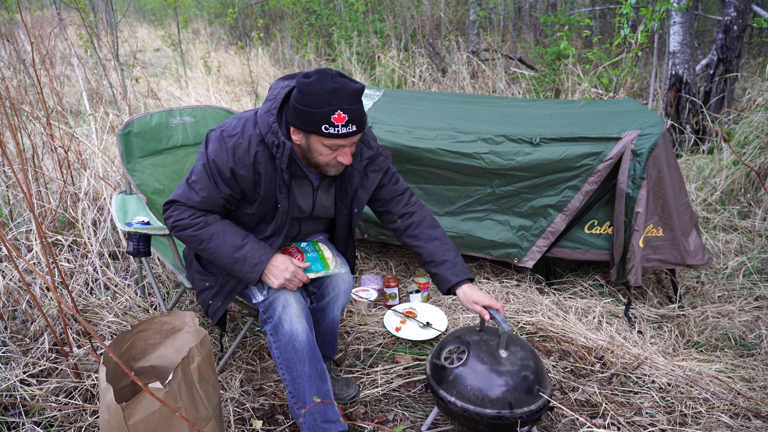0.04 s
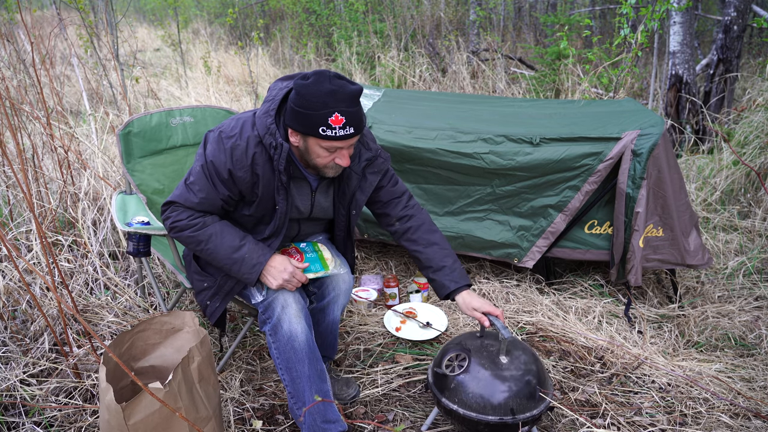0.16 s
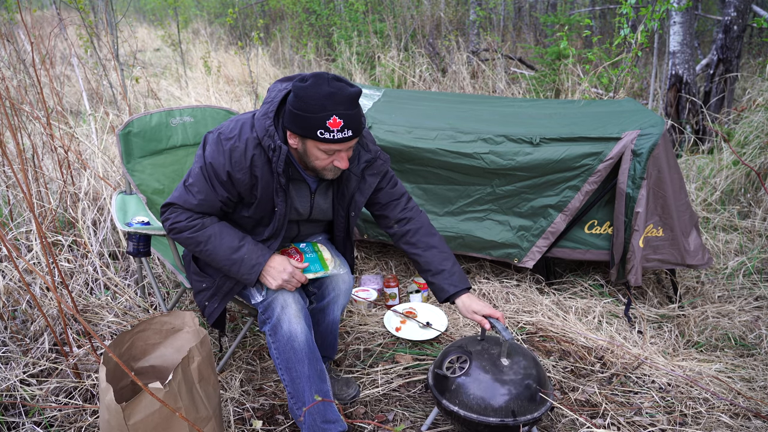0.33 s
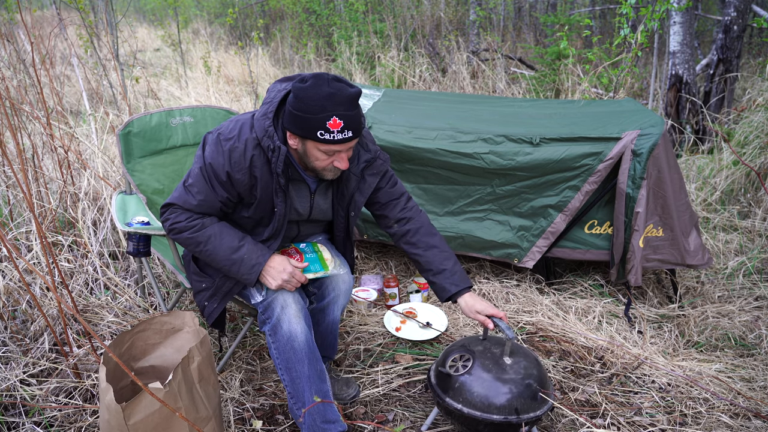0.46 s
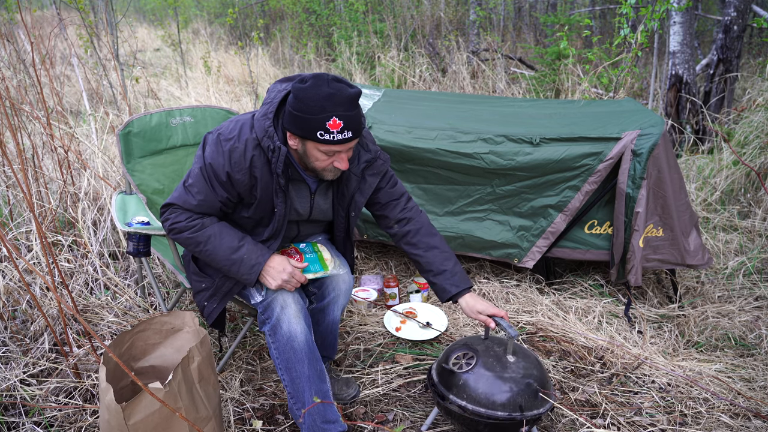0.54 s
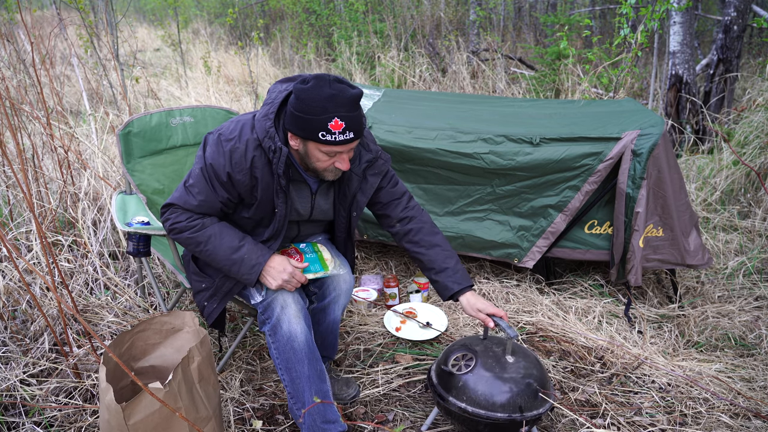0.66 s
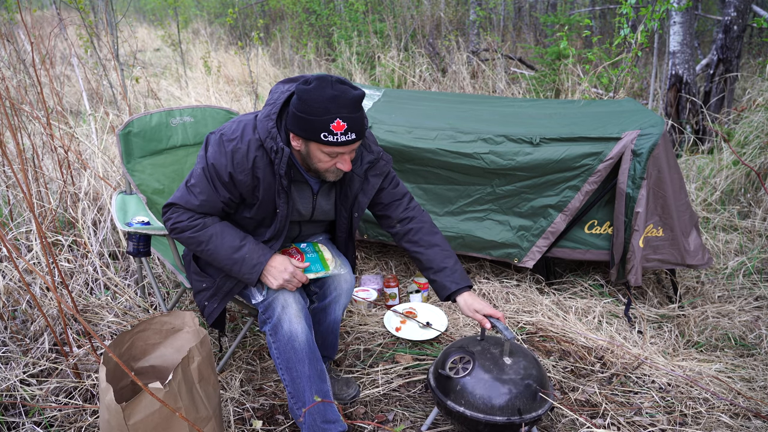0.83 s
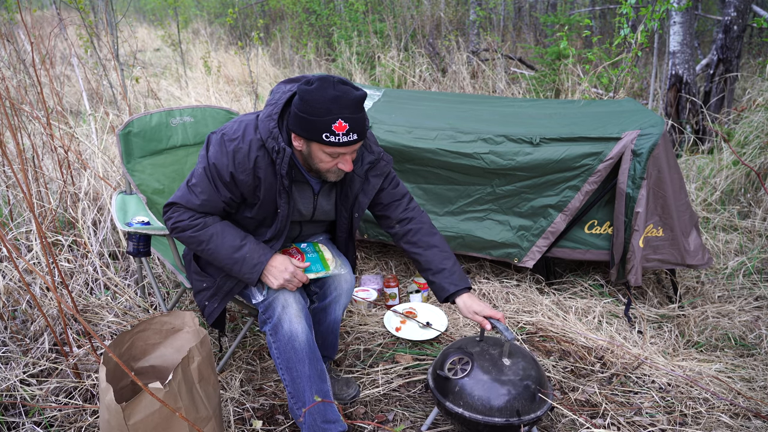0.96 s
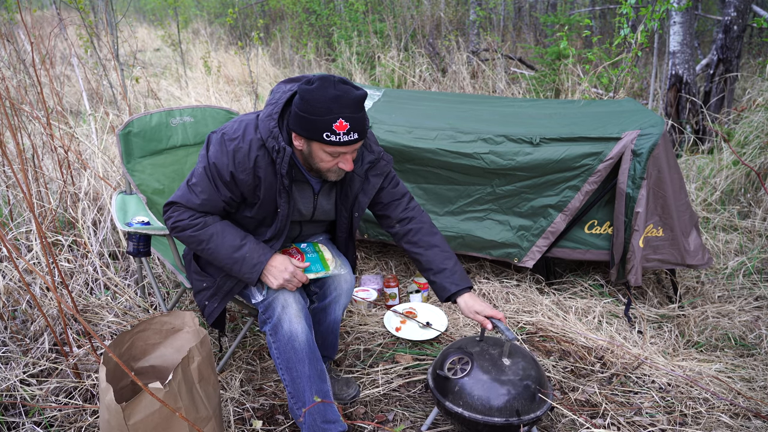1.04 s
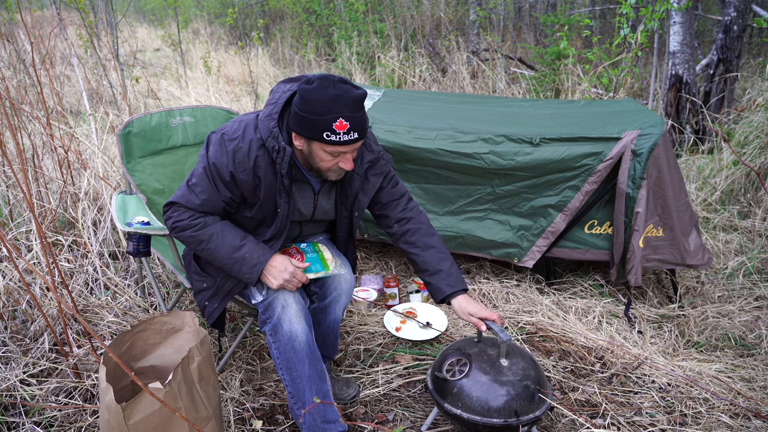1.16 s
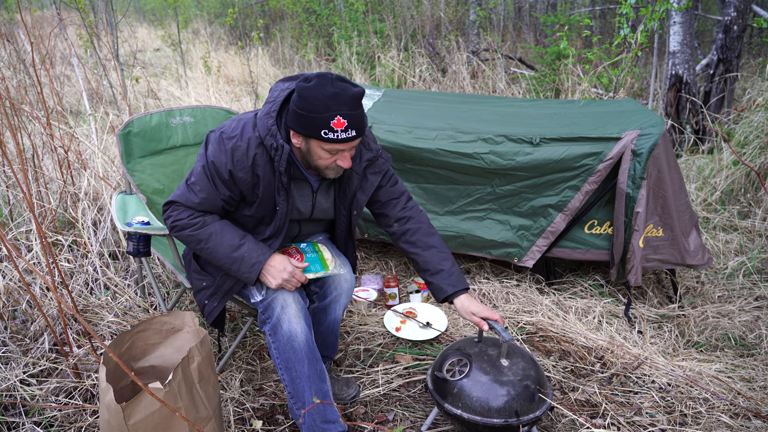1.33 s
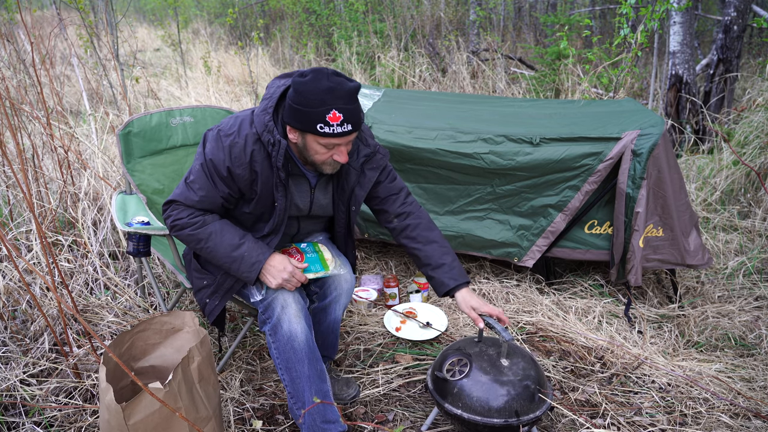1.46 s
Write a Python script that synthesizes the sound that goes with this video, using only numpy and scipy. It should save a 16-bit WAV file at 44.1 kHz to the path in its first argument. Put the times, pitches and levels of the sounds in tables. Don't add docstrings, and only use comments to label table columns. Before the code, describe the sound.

Close up outdoors, a thin steel lid lightly scrapes, clangs brightly on a small charcoal grill, thuds hollowly, rings and grinds round until it settles with a last clank, over soft breeze and dry grass snaps.

```python
import sys
import numpy as np
from scipy import signal
from scipy.fft import rfft, irfft, next_fast_len
from scipy.io import wavfile
from scipy.ndimage import map_coordinates

SR = 44100
rng = np.random.default_rng(int(sys.argv[2]) if len(sys.argv) > 2 else 0)


def convert_level_to_amplitude(level_db):
    exponent = np.asarray(level_db, float) / 20
    return 10 ** exponent


def put_to_file(sound):
    columns = np.atleast_2d(sound).T
    safe = np.clip(columns, -1, 1)
    whole_steps = np.round(safe * 32767)
    wavfile.write(sys.argv[1], SR, whole_steps.astype(np.int16))


N = 66150
TIME = np.arange(N) / SR

# (time [s], level [dB], polarity [-], modes (frequency [Hz], level [dB], t60 [s]))
THUDS = [
    (0.229, -8, -0.98, [(400, 2, 0.014), (546, 8.5, 0.0041)]),
    (.3022, -4.5, -1, [(215.6, -4.5, 0.084), (260, -1, 0.046), (384, 2, 0.055), (703, -11, 0.089), (1548, -15.5, 0.2005), (3415, -27, 0.207)]),
    (0.4701, -6, -0.83, [(280.2, 7.5, 0.055), (696, -1, 0.069), (480, 17, 0.0084), (1683, -21, 0.2), (2790, -17, 0.08)]),
    (0.9326, -11.5, 0.89, [(373, -23, 0.065), (595, 0.5, 0.034), (719, -13.5, 0.12), (810, 5, 0.058), (1690, -11, 0.038), (1910, -14, 0.12), (2000, -15, 0.3), (948, -6, 0.071)]),
    (1.2015, -4.5, -1.07, [(216.4, 0, 0.079), (256, -5.5, 0.063), (417, 7.5, 0.023), (552, 1.5, 0.016), (738, -5.5, 0.047), (900, -23, 0.09), (2220, -24, 0.26)]),
]
ROCK_ATTACK_S = 0.0014
TICK_HZ, TICK_WIDTH_HZ = 2400, 6000


def unit(x):
    return x / np.sqrt(np.mean(x ** 2) + 1e-20)


def along(points, hz):
    f, value = np.transpose(points)
    return np.interp(np.log(hz + 1), np.log(f + 1), value)


def wobble(rate):
    values = rng.standard_normal(int(N * rate / SR) + 4)
    return map_coordinates(values, [TIME * rate])


def filtered(x, response):
    m = next_fast_len(N + SR // 2)
    return irfft(rfft(x, m) * response(np.fft.rfftfreq(m, 1 / SR)), m)[..., :N]


def peak(f, hz, width):
    return 1j * f * width / (hz * hz - f * f + 1j * f * width)


def decay(start, db, t60):
    return (TIME >= start) * convert_level_to_amplitude(db - 60 * np.maximum(TIME - start, 0) / t60)


def ring(start, modes, attack):
    hand_t60, buzz_rad, buzz_per_s, buzz_above_hz = .18, .8, 60, 1200
    t = np.maximum(TIME - start, 0)
    total = np.zeros(N)
    for hz, db, t60 in modes:
        buzz = buzz_rad * (hz > buzz_above_hz) * wobble(buzz_per_s)
        envelope = convert_level_to_amplitude(db - 60 * t / min(t60, hand_t60))
        total = total + envelope * np.sin(2 * np.pi * hz * t + buzz)
    return total * (1 - np.exp(-t / attack))


def air():
    # (frequency [Hz], density [dB per Hz])
    hiss_colour = [(12, -37), (20, 0), (177, -20.5), (485, -12.5), (923, -16), (1060, -21.5), (5530, -27.5),
                   (7520, -29), (16000, -41)]
    # (time [s], level [dB])
    hiss_level = [(0, 4), (.15, 3.5), (.5, 3.5), (1.1, 0.5), (1.35, -1.5), (1.5, 1.5)]
    # (time [s], level [dB])
    wind = [(0, -62), (.07, -56), (.16, -70), (.45, -62), (.55, -78), (1.1, -76), (1.17, -52), (1.25, -61),
            (1.5, -75)]
    air_db, rumble_hz = -52, 110
    hiss = unit(filtered(rng.standard_normal(N), lambda f: convert_level_to_amplitude(along(hiss_colour, f))))
    rumble = unit(filtered(rng.standard_normal(N), lambda f: 1 / (1 + (f / rumble_hz) ** 2)))
    hiss_db = air_db + np.interp(TIME, *np.transpose(hiss_level)) + 0.52 * wobble(11.64)
    rumble_db = np.interp(TIME, *np.transpose(wind)) + 1.1 * wobble(13.0)
    return convert_level_to_amplitude(hiss_db) * hiss + convert_level_to_amplitude(rumble_db) * rumble


def grit():
    grains_per_s, spread_db, judder_db = 9000, 2, 1.5
    hit = rng.random(N) < grains_per_s / SR
    size_db = spread_db * np.minimum(rng.exponential(size=N), 4) + judder_db * wobble(120)
    return unit(hit * rng.choice([-1, 1], N) * convert_level_to_amplitude(size_db))


def contact():
    starts = [.179, .255, .414, .445, .485, .565, .70, .849, .9, .935, .98, 1.07, 1.129, 1.155, 1.205, 1.41,
              0, 1.25]
    lengths = [.049, .09, .03, .025, .08, .06, .15, .051, .033, .04, .05, .025, .026, .046, .04, .09, .12,
               .08]
    press_start_db = [-35.5, -30, -47.5, -38, -31, -45.5, -41.5, -32.5, -31, -25, -43, -51, -39.5, -30.5,
                      -26, -56.5, -56, -53]
    press_end_db = [-31, -32.5, -35.5, -38, -37, -43.5, -43.5, -26, -27, -34.5, -44, -58.5, -44, -29.5, -38,
                    -55, -69, -60.5]
    treble_db = [3, -17, 7, 12, 1, 3, 5, 7.5, 7, -5, 6, 14, 0, 10.5, -4, 11.5, 10, 2]
    # (time [s], strength [dB], brightness [dB], rattle t60 [s])
    taps = [(.3035, -23.5, -22, 0.079), (.4698, -16, -23, 0.036), (.6535, -39.5, -12, 0.15),
            (.9325, -22, -18, 0.058), (1.2012, -15.5, -21, 0.029), (1.129, -34, 3, 0.016),
            (1.1555, -41, 7, 0.017), (.4145, -31.5, -18, 0.014), (0.19, -33, 3, 0.023),
            (0.25, -38.5, 14, 0.026), (.955, -26.5, -3, .02), (1.231, -25.5, -12, 0.021)]
    attack_s, release_s = 0.0015, 0.016
    dull, bright = np.zeros(N), np.zeros(N)
    strokes = zip(starts, lengths, press_start_db, press_end_db, treble_db)
    for start, length, from_db, to_db, bright_db in strokes:
        t = TIME - start
        press = convert_level_to_amplitude(np.interp(t, [0, length], [from_db, to_db])) * np.clip(t / attack_s, 0, 1)
        press = press * np.exp(-np.maximum(t - length, 0) / release_s)
        dull = dull + press
        bright = bright + press * convert_level_to_amplitude(bright_db)
    for start, db, bright_db, t60 in taps:
        press = decay(start, db, t60)
        dull = dull + press
        bright = bright + press * convert_level_to_amplitude(bright_db)
    return dull, bright


def sheet(colour):
    # (frequency [Hz], t60 [s])
    sheet_t60 = [(300, 0.036), (2000, 0.11), (6000, 0.072), (14000, 0.04)]
    hz, t, z = signal.stft(rng.standard_normal(SR // 4), SR, nperseg=128)
    level_db = along(colour, hz)[:, None] - 60 * t / along(sheet_t60, hz)[:, None]
    h = signal.istft(z * convert_level_to_amplitude(level_db), SR, nperseg=128)[1]
    return h / np.linalg.norm(h)


def shifting(force, count=17):
    # (frequency [Hz], density [dB per Hz])
    sheet_colour = [(120, -21), (300, -3.5), (800, -11), (1250, -9.5), (2100, -5), (7500, -18),
                    (10500, -30.5), (16000, -50)]
    shift_s = 0.0907
    total = np.zeros(N)
    for k in range(count + 1):
        share = np.sqrt(np.clip(1 - np.abs(TIME / shift_s - k), 0, 1))
        total = total + signal.fftconvolve(force * share, sheet(sheet_colour))[:N]
    return total


def scraping():
    # (frequency [Hz], width [Hz], level [dB])
    lid_modes = [(1542, 36, -14), (1664, 18, 0.5), (1783, 90, -3.5), (1990, 23, 1), (2128, 62, -3.5),
                 (2259, 41, -2.5), (2837, 55, -16), (2945, 180, -15), (3333, 130, -10.5), (4044, 58, -7.5),
                 (4380, 46, -26), (5600, 84, -36), (7670, 250, -20.5)]
    bright_hz, grit_db, lid_db = 4150, -18.5, -4
    hollow_db, hollow_hz, hollow_width_hz = -6.5, 250, 63

    def high(f):
        return (1j * f / bright_hz / (1 + 1j * f / bright_hz)) ** 2

    def lid_response(f):
        return sum((-1) ** k * convert_level_to_amplitude(db) * peak(f, hz, width)
                   for k, (hz, width, db) in enumerate(lid_modes))

    def hollow_response(f):
        return peak(f, hollow_hz, hollow_width_hz) * np.sqrt(SR / hollow_width_hz / np.pi)

    dull, bright = contact()
    grains = grit()
    force = filtered(grains, lambda f: 1 - high(f)) * dull + filtered(grains, high) * bright
    direct = filtered(force, lambda f: peak(f, TICK_HZ, TICK_WIDTH_HZ))
    clear = filtered(force, lid_response) / np.std(filtered(grit(), lid_response))
    hollow = filtered(rng.standard_normal(N) * dull, hollow_response)
    return shifting(force) + convert_level_to_amplitude(grit_db) * direct + convert_level_to_amplitude(lid_db) * clear + convert_level_to_amplitude(hollow_db) * hollow


def singing():
    # (time [s], level [dB], frequency [Hz], t60 [s])
    rings = [(.181, -31, 2210, 0.18), (.189, -30, 4550, 0.072), (.192, -30, 5030, 0.04),
             (.192, -32, 3320, 0.11), (.31, -29, 2266, .17), (.31, -37, 3036, 0.061),
             (.333, -22.5, 3400, 0.059), (.316, -36, 4506, .1), (.32, -34, 4700, 0.11),
             (.36, -47, 2800, 0.053), (.416, -26.5, 2230, .1), (.418, -34, 1930, .08),
             (.472, -30, 2275, 0.13), (.495, -29, 3300, .08), (.5, -34, 2170, .12),
             (.53, -29.5, 1935, 0.13), (.535, -40, 2260, 0.13), (.61, -37.5, 2153, 0.25),
             (.655, -30, 1770, 0.054), (.662, -42, 2900, 0.1), (.905, -24.5, 3914, 0.2),
             (.91, -24.5, 2895, 0.17), (.935, -21.5, 3330, 0.14), (.965, -28, 1960, 0.12),
             (.995, -30.5, 1960, 0.2), (1, -35.5, 1895, 0.16), (1.13, -39, 2228, 0.073),
             (1.13, -52, 4100, .06), (1.1565, -25, 5600, 0.036), (1.1565, -24.5, 7500, 0.055),
             (1.202, -23, 2686, 0.056), (1.203, -24, 1653, 0.11), (1.21, -29.5, 3343, .15),
             (1.215, -32, 4700, 0.1), (1.22, -32, 4522, 0.14), (1.228, -22.5, 2260, 0.15),
             (1.288, -42, 2260, .1), (.85, -34.5, 816, 0.14), (0.896, -30, 1240, .05), (.57, -35, 832, .08),
             (.985, -38, 772, .1), (0.304, -20, 1880, 0.076), (.325, -28, 2170, 0.13),
             (.77, -42, 292, 0.072), (0.469, -24, 4670, 0.044), (1.166, -35, 5500, .06),
             (.045, -46, 1100, 0.096)]
    return sum(ring(s, [(hz, db, t60)], ROCK_ATTACK_S) for s, db, hz, t60 in rings)


def ticks():
    # (time [s], level [dB], t60 [s])
    snaps = [
        (.0458, -28, .014),
        (.079, -40, .01),
        (.148, -38, .01),
        (.2299, -4, .008),
        (.4705, -17, .003),
        (1.018, -39, .008),
        (1.31, -45, .01),
        (.2345, -5, .006),
        (.8565, -24, .012),
        (1.1562, -19, .008),
    ]
    top_hz = [6000, 6000, 10000, 14000, 9000, 8000, 7000, 15000, 9000, 12000]
    noise = rng.standard_normal(N)
    total = np.zeros(N)
    for (start, db, t60), hz in zip(snaps, top_hz):
        burst = decay(start, db, t60) * noise
        total = total + filtered(
            burst, lambda f: peak(f, TICK_HZ, TICK_WIDTH_HZ) / (1 + 1j * f / hz) ** 2)
    return total


def dome():
    # (time [s], level [dB], frequency [Hz], t60 [s])
    rocks = [(0.289, -18, 300, 0.015), (0.416, -29.5, 250, 0.062), (.507, -12.5, 250, 0.025),
             (.531, -23, 410, 0.023), (.563, -26, 253.6, 0.15), (.6, -33, 547, 0.089),
             (0.726, -22, 250, 0.057), (0.807, -28.5, 280, 0.053), (.851, -18.5, 252, 0.11),
             (0.94, -5.5, 210, 0.046), (0.899, -19, 200, 0.075), (0.996, -29, 215, 0.055),
             (1.016, -21.5, 213, 0.054), (1.164, -14, 255, 0.023), (1.46, -36.5, 259.3, 0.089)]
    thud_attack_s = 0.00069
    thuds = sum(sign * convert_level_to_amplitude(db) * ring(s, modes, thud_attack_s) for s, db, sign, modes in THUDS)
    return thuds + sum(ring(s, [(hz, db, t60)], ROCK_ATTACK_S) for s, db, hz, t60 in rocks)


def ground():
    ground_db, ground_t60, ground_hz, width_hz = -35, 0.077, 77, 61
    drops = sum(decay(s, db, ground_t60) for s, db, *_ in THUDS)
    shake = rng.standard_normal(N) * drops
    soil = filtered(shake, lambda f: peak(f, ground_hz, width_hz) * np.sqrt(SR / width_hz))
    return convert_level_to_amplitude(ground_db) * soil


def clang():
    # (frequency [Hz], level [dB], t60 [s])
    rim_modes = [(1524, -0.5, 0.048), (1578, -4, 0.17), (3144, 3, 0.075), (3330, 4.5, 0.072),
                 (4146, 6.5, 0.11), (4554, -5, 0.17), (4860, -5, 0.083), (5390, -1, 0.2), (5545, -7, 0.23),
                 (6150, 5, 0.021), (6400, -3, 0.15), (6840, 3, 0.062), (7260, 0, 0.13), (7980, -2.5, 0.1)]
    # (frequency [Hz], density [dB per Hz])
    chatter_colour = [(800, -25), (1500, -14.5), (3300, -13), (4400, -1.5), (6500, 2.5), (9500, -15),
                      (12500, -22), (16000, -18)]
    # (time [s], level [dB], t60 [s])
    rattles = [
        (0.2295, -6, 0.018),
        (0.235, -15, 0.1),
        (1.1547, -22, 0.037),
    ]
    clang_s, clang_db, crack_s = .2295, -21, .0003
    chatter = np.zeros(N)
    for start, db, t60 in rattles:
        force = grit() * decay(start, db, t60)
        chatter = chatter + signal.fftconvolve(force, sheet(chatter_colour))[:N]
    return convert_level_to_amplitude(clang_db) * ring(clang_s, rim_modes, crack_s) + chatter


def highpass(f, hz):
    s = 1j * f / hz
    return (s * s / (s * s + np.sqrt(2) * s + 1)) ** 2


def scene():
    vibration = scraping() + singing() + dome() + clang()
    lid = filtered(vibration, lambda f: highpass(f, 170))
    return (air() + lid + ticks() + ground())[None]


def band_limit(x):
    return signal.sosfilt(signal.butter(12, 16480, fs=SR, output="sos"), x)


def record(dry):
    # (frequency [Hz], gain [dB])
    microphone = [(15, -12), (45, -6.5), (70, 0.5), (9000, -0.5), (10600, -6), (13000, 3), (15700, -3.5)]
    clip, knee, top_hz = 1.15, 5, 15700
    heard = filtered(dry, lambda f: convert_level_to_amplitude(along(microphone, f)))
    clipped = heard / (1 + np.abs(heard / clip) ** knee) ** (1 / knee)
    mix = filtered(clipped, lambda f: f < top_hz)
    return band_limit(mix)


dry = scene()
out = record(dry)
put_to_file(out)
```